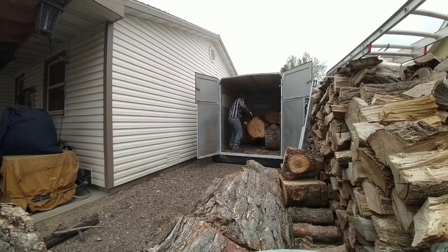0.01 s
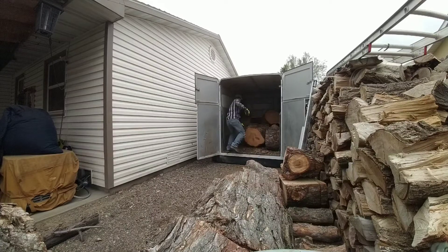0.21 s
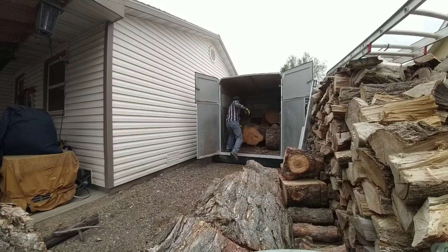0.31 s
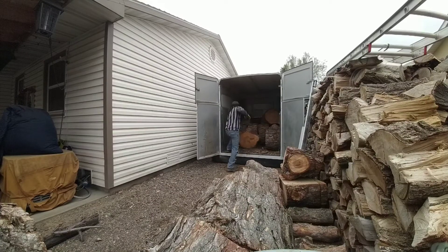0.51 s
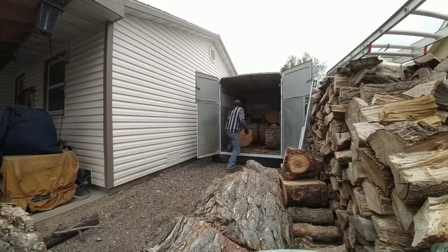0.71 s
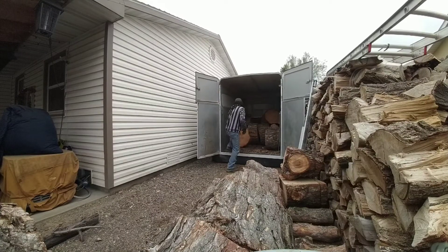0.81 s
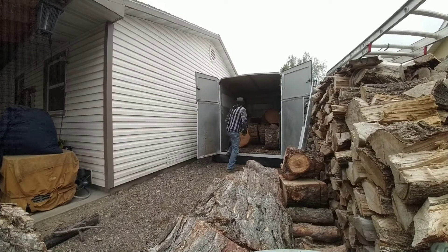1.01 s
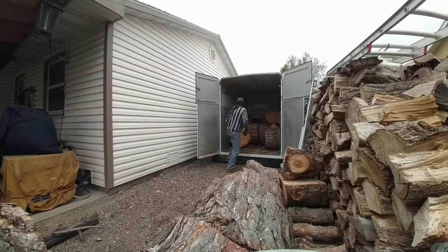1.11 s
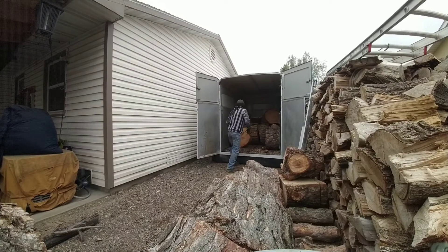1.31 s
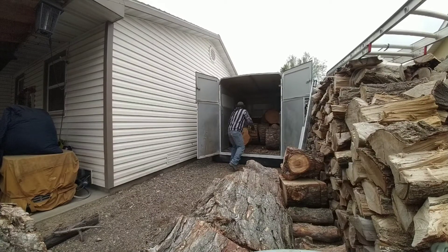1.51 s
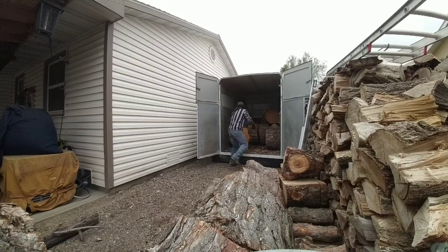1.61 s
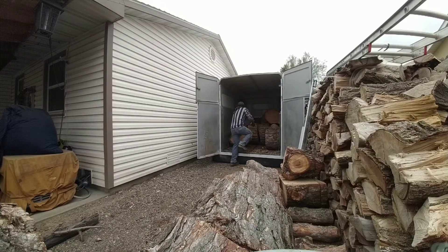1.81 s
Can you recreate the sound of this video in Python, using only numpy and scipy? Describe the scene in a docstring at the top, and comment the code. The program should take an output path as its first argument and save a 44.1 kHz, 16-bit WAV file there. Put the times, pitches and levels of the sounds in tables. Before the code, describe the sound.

A heavy log round scrapes over grit, bangs onto the metal floor of an enclosed trailer and rolls with a hollow rumble; a second shove thumps it onward, then it fades to low hum, heard outdoors.

```python
"""Grit crunches and bark scuffs over a low hum and faint outdoor air; then a heavy log round, tipped onto
the metal floor of an enclosed trailer, strikes and rolls, and a second shove thumps it and rolls it on.
Blows and bark ridges excite decaying floor modes and noisy panels, slow pushes the lowest modes alone;
the thump is a damped sine, crunch and scuffs are trains of random clicks, and the box adds diffuse echo."""
import sys
import numpy as np
from scipy import signal
from scipy.io import wavfile
from scipy.ndimage import uniform_filter1d

SR = 44100
rng = np.random.default_rng(int(sys.argv[2]) if len(sys.argv) > 2 else 0)


def wrap_up_sound(samples):
    """Save the sound to the file named by the first command line argument, as 16-bit audio."""
    columns = np.atleast_2d(samples).T
    # keep every value between -1 and 1, then stretch to whole-number steps
    tamed = np.clip(columns, -1, 1)
    steps = np.round(tamed * 32767).astype(np.int16)
    wavfile.write(sys.argv[1], SR, steps)


N = 81585
TIME = np.arange(N) / SR
ECHO_T60_S = 0.42   # decay of the echo behind grit and scuffs
RELEASE_S = 0.0087   # time constant with which a crunch or scuff dies


def from_db(db):
    """Amplitude gain is ten to the power of the level over 20 dB."""
    return 10 ** (np.asarray(db) / 20)


def filtered(x, hz, kind, order=2):
    """A Butterworth filter has a maximally flat passband."""
    edge = np.clip(hz, 10, 0.45 * SR)
    sections = signal.butter(order, edge, kind, fs=SR, output="sos")
    return signal.sosfilt(sections, x + 1e-18)


def through(x, response):
    """A linear resonator's output is the input convolved with its impulse response."""
    return signal.fftconvolve(x, response)[:N]


def dying(t60):
    """Linear damping gives exponential decay, by 60 dB in t60 seconds."""
    return from_db(-60 * TIME / t60)


def evened(x, seconds):
    """Dividing by the running rms holds a texture's level at 1."""
    power = np.abs(uniform_filter1d(x ** 2, int(seconds * SR)))
    return x / np.sqrt(power + 1e-12)


def coloured(spectrum, envelope=lambda hz: 1):
    """Half-octave noise bands sum to a coloured spectrum, each with its own decay; rms 1 if undamped."""
    edges = 28 * 2 ** np.arange(0, 9.6, 0.5)
    white = rng.standard_normal((2, N))   # neighbouring bands take different noise
    points_hz, points_db = np.array(spectrum).T
    out, undamped = 0, 0
    for k, (low, high) in enumerate(zip(edges, edges[1:])):
        hz = np.sqrt(low * high)
        level_db = np.interp(np.log(hz), np.log(points_hz), points_db)
        band = filtered(white[k % 2], [low, high], "band") * from_db(level_db)
        out = out + band * envelope(hz)
        undamped = undamped + band
    return out / np.std(undamped)


def clicks(per_s, spread_db):
    """Random contacts form a Bernoulli impulse train with uneven sizes and random signs."""
    size_db = spread_db * np.minimum(rng.exponential(1, N), 4)
    sizes = from_db(size_db) * rng.choice([-1, 1], N)
    return sizes * (rng.random(N) < per_s / SR)


def stroke(start, length, rise=0.001):
    """Friction builds up linearly, holds, and relaxes exponentially after the given length."""
    age = TIME - start
    attack = np.clip(age / rise, 0, 1)
    return attack * np.exp(-np.maximum(age - length, 0) / RELEASE_S)


def in_box(x, echo_db):
    """A diffuse field is decaying noise convolved with the source; scaling keeps the power about equal."""
    tail = rng.standard_normal(N) * dying(ECHO_T60_S)
    echo = through(x, tail / np.linalg.norm(tail))
    return (x + from_db(echo_db) * echo) / np.hypot(1, from_db(echo_db))


def background():
    """A stationary field: a steady sine hum in stationary coloured noise, the faint outdoor air."""
    # spectrum of the outdoor air: (frequency [Hz], relative density [dB per Hz])
    air = [(30, -9), (60, 8.5), (120, -10), (300, -17.5), (800, -14), (2000, -22), (5000, -25),
           (15000, -32.5)]
    hum_hz, hum_db, air_db = 53.8, -37, -46.5   # both levels are rms
    hum = np.sqrt(2) * np.sin(2 * np.pi * hum_hz * TIME)
    return from_db(hum_db) * hum + from_db(air_db) * coloured(air)


def scuffs():
    """Stick-slip: bark slips in quick jerks, band-limited round a pitch; the narrow bands squeak."""
    # bark scuffs and catches: (time [s], level [dB], length [s], pitch [Hz],
    # upper band edge over pitch [ratio, held to at least 1.02])
    scuff_table = [(0, -37, 0.052, 1720, 1.48), (.051, -27.5, .018, 1200, 1.42),
                   (0.253, -29, 0.021, 2930, 1.13), (0.667, -35, 0.028, 970, 1.5),
                   (0.801, -29.5, 0.021, 1940, 1.35), (0.826, -34.5, 0.046, 1210, 1.5),
                   (.895, -27.5, .016, 2310, 1.27), (.989, -25, 0.011, 755, 0.96),
                   (1.295, -56, 0.025, 2500, 0.94), (1.426, -49, 0.047, 1360, 1.35),
                   (1.49, -57, .02, 2480, 0.97), (1.603, -53, 0.01, 2470, 0.96)]
    slips_per_s, echo_db = 970, -8.5
    out = 0
    for s, db, length, hz, ratio in scuff_table:
        width = max(ratio, 1.02)
        slips = filtered(clicks(slips_per_s, spread_db=1), [hz / width, hz * width], "band")
        out = out + from_db(db) * stroke(s, length, rise=0.0012) * evened(slips, seconds=0.04)
    return in_box(out, echo_db)


def grit():
    """Brittle fracture: bursts of tiny bright snaps, whose power decays as a smooth echo in the box."""
    # grit crushed and dragged: (time [s], level [dB], length [s], rise [s], extra treble [dB])
    crunches = [(0, -38.5, 0.093, 0.00081, -3.5), (0.108, -26.5, 0.013, .001, 1.5),
                (0.137, -31.5, 0.014, .003, -1), (0.163, -30, 0.014, .002, -0.5),
                (0.193, -27, 0.0095, 0.0022, -2), (0.219, -29.5, 0.015, .003, 2),
                (0.28, -27, 0.021, 0.0037, 2), (0.344, -35, 0.076, 0.012, 0),
                (0.448, -33, 0.031, 0.0056, 2.5), (0.498, -37, 0.083, 0.014, -3.5),
                (0.642, -39, 0.029, 0.017, 0), (.751, -39.5, .008, .001, 2), (0.782, -32.5, 0.037, .006, 3),
                (0.834, -33.5, 0.034, .01, 0), (0.882, -34.5, 0.034, 0.0074, 4),
                (0.915, -30, 0.025, 0.0076, 0.5), (0.972, -37.5, 0.05, 0.012, 4.5),
                (1.065, -35.5, 0.018, .006, 2), (1.135, -44.5, .035, 0.011, 0), (1.22, -54, 0.073, .02, 3),
                (1.286, -46, .012, .004, -1), (1.38, -46.5, 0.029, .015, -2), (1.495, -47, .014, .005, -1),
                (1.592, -48, .012, .006, -2)]
    # spectrum of one snap: (frequency [Hz], relative density [dB per Hz])
    snap_spectrum = [(300, 4), (1500, -1), (3000, 3.5), (4500, -2.5), (8000, -4), (11000, -3.5),
                     (15500, -10)]
    grains_per_s, grain_spread_db = 5000, -1
    catches_per_s, catch_db = 160, 2.5
    treble_hz, echo_db = 8500, 2.5

    # the grit catches and gives unevenly
    knots = np.arange(0, TIME[-1] + 0.1, 1 / catches_per_s)
    catching_db = catch_db * np.interp(TIME, knots, rng.standard_normal(N)[:len(knots)])
    grains = from_db(catching_db) * evened(clicks(grains_per_s, grain_spread_db), seconds=0.04)
    diffuse = rng.standard_normal(N)

    body_power, top_power = 0, 0
    for s, db, length, rise, treble_db in crunches:
        shape = stroke(s, length, rise)
        body_power = body_power + (from_db(db) * shape) ** 2
        top_power = top_power + (from_db(db + treble_db) * shape) ** 2

    power_tail = dying(ECHO_T60_S) ** 2   # power falls as amplitude squared
    wet = from_db(echo_db)
    out = 0
    for power, kind in ((body_power, "low"), (top_power, "high")):
        echo_level = np.sqrt(np.abs(through(power, power_tail / power_tail.sum())))
        crunch = np.sqrt(power) * grains + wet * echo_level * diffuse
        out = out + filtered(crunch, treble_hz, kind, order=3)

    hz = np.linspace(0, SR / 2, 129)
    snap_gain = from_db(np.interp(hz, *np.transpose(snap_spectrum)))
    snap = signal.firwin2(65, hz, snap_gain, fs=SR)
    return through(out, snap / np.linalg.norm(snap)) / np.hypot(1, wet)


def floor_ring():
    """Modal superposition: a unit tap leaves the floor ringing as a sum of damped sines."""
    # modes of floor and box: (frequency [Hz], level [dB], t60 [s])
    floor_modes = [(60.5, -2.5, 0.18), (69.5, -3.5, 0.12), (86.6, -5.5, .13), (156.5, -5.5, 0.13),
                   (189, 0, 0.076), (210.1, -6, 0.111), (262, -5, 0.21), (320.6, -6, 0.14),
                   (408.5, -14.5, 0.59), (564, -18.5, 0.52), (627.5, -20.5, 0.42), (802, -11.5, 0.18),
                   (883, -9.5, 0.16), (1345, -7, 0.057), (1924, -1, 0.043)]
    ring = 0
    for hz, db, t60 in floor_modes:
        ring = ring + from_db(db) * np.sin(2 * np.pi * hz * TIME) * dying(t60)
    return ring


def panel_ring():
    """High modal density makes panels clatter like noise; the box echo dies faster in the treble."""
    # spectrum of the panels: (frequency [Hz], relative density [dB per Hz])
    panels = [(90, 14.5), (160, 3), (250, 6), (350, 2.5), (520, -2), (850, -1), (1200, -4.5), (2100, -9),
              (3200, -16), (5000, -23), (15000, -16.5)]
    clatter_t60_s = 0.13
    box_t60_s, box_db, damping = 0.35, -3.5, 0.36   # box t60 at 1 kHz

    def decay(hz):
        """Absorption shortens the box's t60 as a power of frequency."""
        box_t60 = box_t60_s * (1000 / hz) ** damping
        return dying(clatter_t60_s) + from_db(box_db) * dying(box_t60)

    return coloured(panels, decay)


def rolling(floor, spots):
    """Roughness excitation: ridges of bark bump over the floor, a panel rumble above a floor boom."""
    # course of the roll: (time [s], level of the rumble [dB], level of the boom [dB])
    roll = [(0, -35, -38), (.2, -51, -36), (0.279, -22, -12), (.42, -19.5, -27.5), (.52, -32, -22),
            (.62, -28, -24.5), (.74, -35.5, -23.5), (.86, -32, -28), (0.929, -22, -15), (1.02, -21, -29),
            (1.102, -23.5, -21), (1.22, -29, -20.5), (1.27, -33.5, -35), (1.33, -40, -31),
            (1.46, -41.5, -32.5), (1.56, -46.5, -45), (1.64, -55, -45), (1.85, -55, -60)]
    # pass band of the rumble: low and high edge [Hz]
    rumble_band = [92, 1260]
    bumps_per_s, bump_spread_db = 360, 3.0
    modes_db, boom_edge_hz = -4, 101.6   # level of the floor modes in the rumble; its split from the boom
    s, rumble_db, boom_db = np.transpose(roll)

    # every spot of the floor gets its own bumps
    bumps = [clicks(bumps_per_s / len(spots), bump_spread_db) for spot in spots]
    ringing = through(sum(bumps), floor)
    rumble = sum(map(through, bumps, spots)) + from_db(modes_db) * ringing
    rumble = filtered(rumble, rumble_band, "band", order=1)
    rumble = evened(filtered(rumble, boom_edge_hz, "high", order=4), seconds=0.04)
    boom = evened(filtered(ringing, [42, boom_edge_hz], "band", order=3), seconds=0.045)

    rumble_gain = from_db(np.interp(TIME, s, rumble_db))
    boom_gain = from_db(np.interp(TIME, s, boom_db))
    return rumble * rumble_gain + boom * boom_gain


def thump():
    """Heavy damping: a dull knock of wood on wood, a low sine that dies within a few cycles."""
    start_s, level_db, hz, rise_s = 0.8805, 0, 179, 0.0025
    age = np.maximum(TIME - start_s, 0)
    envelope = age / rise_s * np.exp(1 - age / rise_s)   # peaks at 1 after the rise
    return -from_db(level_db) * envelope * np.sin(2 * np.pi * hz * age)


def thuds(floor):
    """Contact time limits bandwidth: slow half-sine pushes mainly excite the low floor modes."""
    # the log's weight comes down on the floor: (time [s], level of the impulse [dB], contact [s])
    thud_table = [(0.228, -7, 0.0054), (0.294, -13, 0.021), (0.427, -9.5, 0.012), (0.483, -13, 0.013),
                  (0.555, -11.5, 0.013), (.665, -16, 0.0052), (0.717, -15.5, 0.0076), (.772, -12, 0.014),
                  (0.9, -11, 0.0042), (0.937, -20, 0.0046), (0.992, -11, 0.0073), (1.074, -8, 0.016),
                  (1.143, -20, 0.0042), (1.201, -19, 0.0076), (1.335, -17, 0.019), (1.418, -28, 0.012),
                  (1.497, -21, 0.0099), (1.582, -27.5, 0.0092)]
    force = 0
    for s, db, contact in thud_table:
        push = np.sin(np.pi * np.clip((TIME - s) / contact, 0, 1))
        force = force + from_db(db) * push / push.sum()
    return through(force, floor)


def blows(floor, spots):
    """Impulse excitation: hard contacts on changing spots ring panels and floor; softer ones are duller."""
    # hard blows on the floor: (time [s], level of the impulse [dB], brightness as low-pass edge [Hz])
    blow_table = [(.053, -37, 2480), (.134, -24.5, 240), (.147, -48, 250), (.2125, -13, 2460),
                  (.2175, -12, 3500), (.230, -34, 1500), (.288, -24.5, 2530), (.395, -29, 900),
                  (.472, -16.5, 790), (.751, -31, 5000), (.981, -21, 696), (1.071, -25, 3400),
                  (1.538, -33, 353), (1.725, -37.5, 1960), (1.736, -40, 450)]
    modes_db, low_cut_hz = -1, 119
    out = 0
    for k, (s, db, hz) in enumerate(blow_table):
        tap = signal.unit_impulse(N, int(s * SR))
        force = from_db(db) * filtered(tap, hz, "low", order=1)
        response = spots[k % len(spots)] + from_db(modes_db) * floor
        out = out + through(force, response)
    return filtered(out, low_cut_hz, "high")   # a short blow hardly moves the floor as a whole


def scene():
    """Sources superpose in the middle; an independent crunch's top, opposite in the ears, adds slight width."""
    floor = floor_ring()
    spots = [panel_ring() for spot in range(9)]   # each spot of the floor rings differently
    mid = background() + scuffs() + grit()
    mid = mid + rolling(floor, spots) + thump() + thuds(floor) + blows(floor, spots)
    side_db = -30.5
    side = from_db(side_db) * filtered(grit(), 9500, "high", order=4)
    return np.array([mid + side, mid - side])


def record(dry):
    """Band limiting and saturation: the microphone loses the deepest bass, peaks round, the top is cut."""
    low_cut_hz, cutoff_hz = 42.8, 15900
    rounded = 0.84 * np.tanh(filtered(dry, low_cut_hz, "high", order=4) / 0.88)
    top_cut = signal.ellip(10, 0.2, 80, cutoff_hz, fs=SR, output="sos")   # 0.2 dB ripple, 80 dB stop band
    return signal.sosfilt(top_cut, rounded)


dry = scene()
out = record(dry)
wrap_up_sound(out)
```